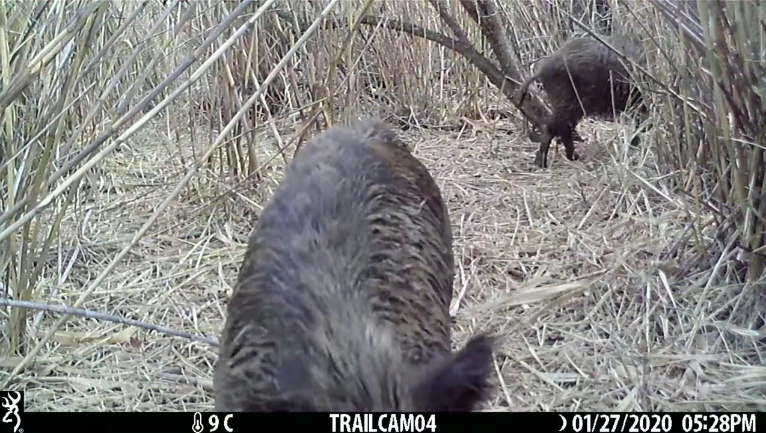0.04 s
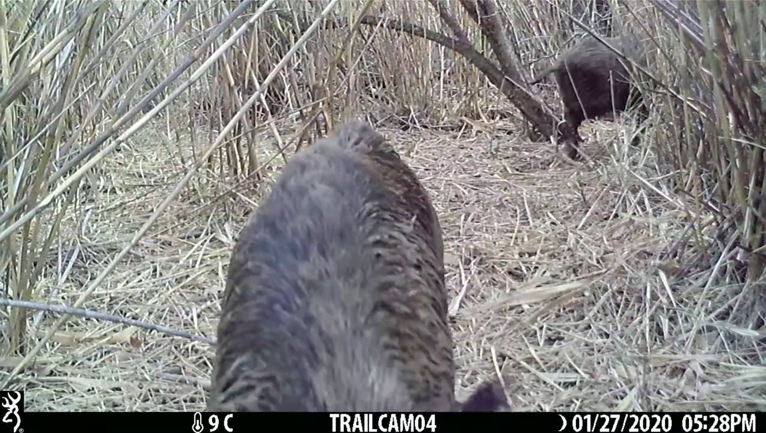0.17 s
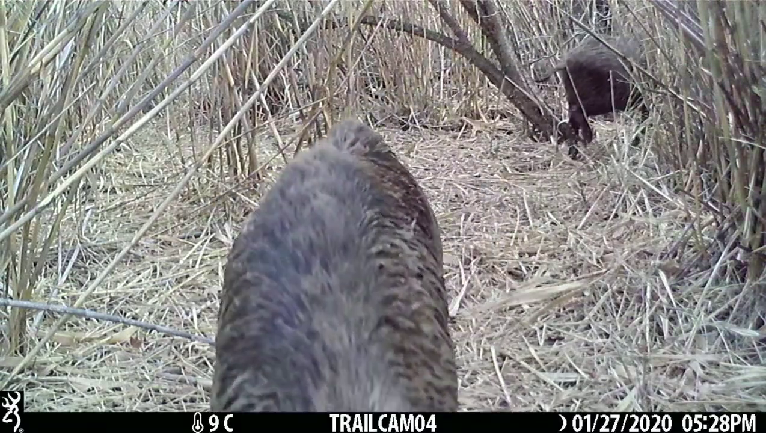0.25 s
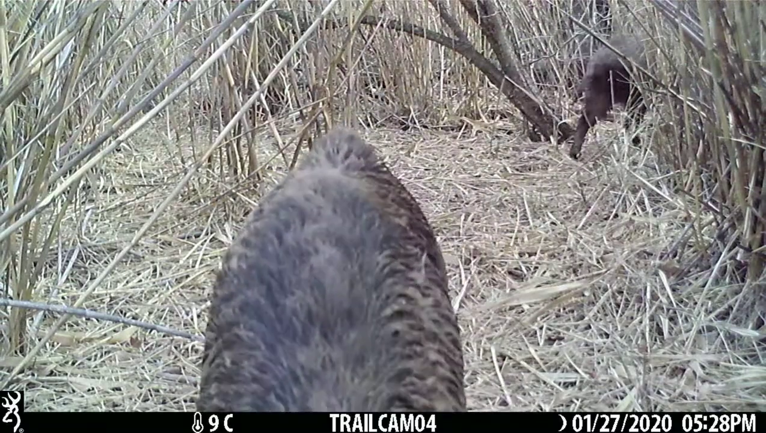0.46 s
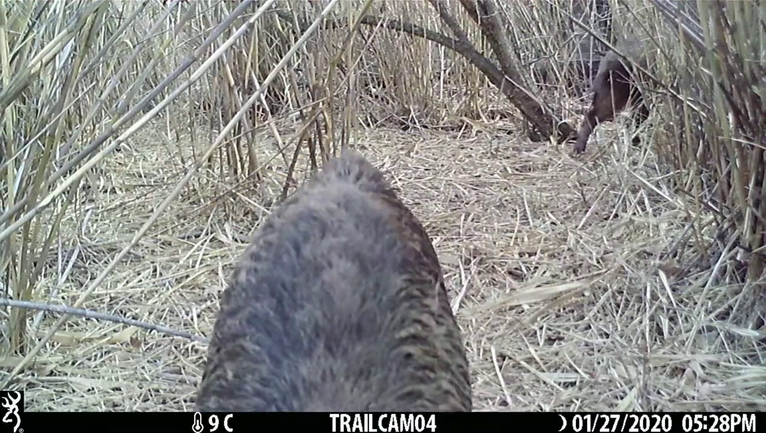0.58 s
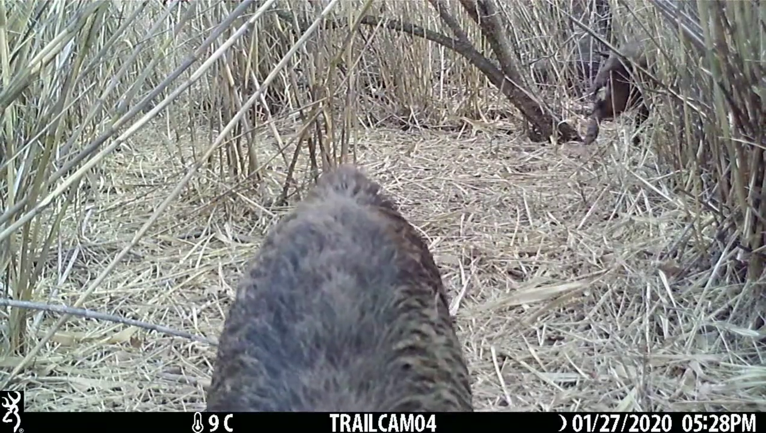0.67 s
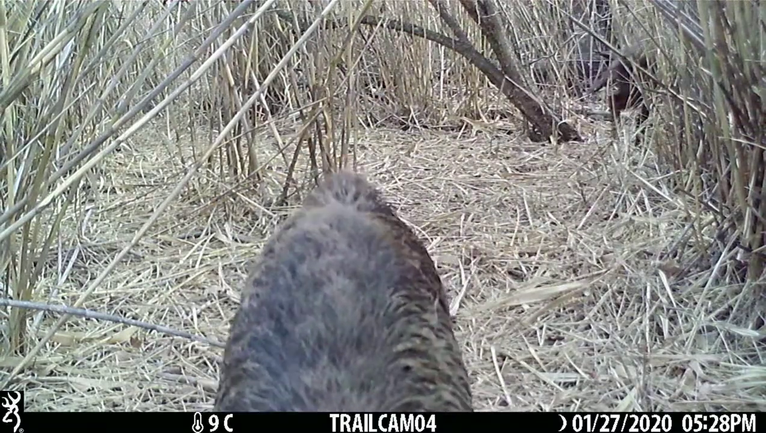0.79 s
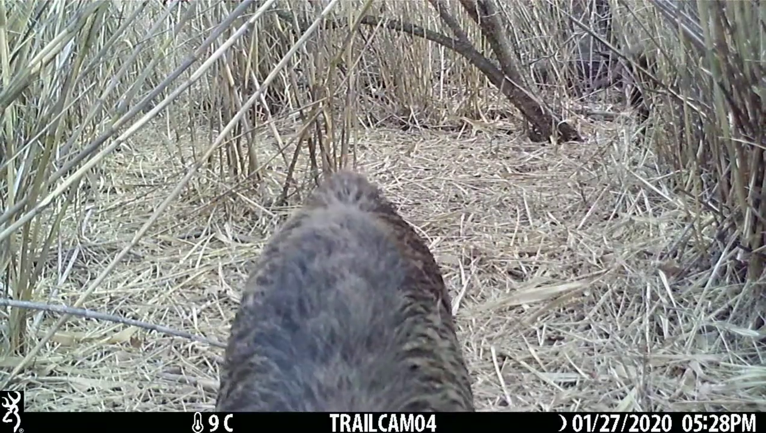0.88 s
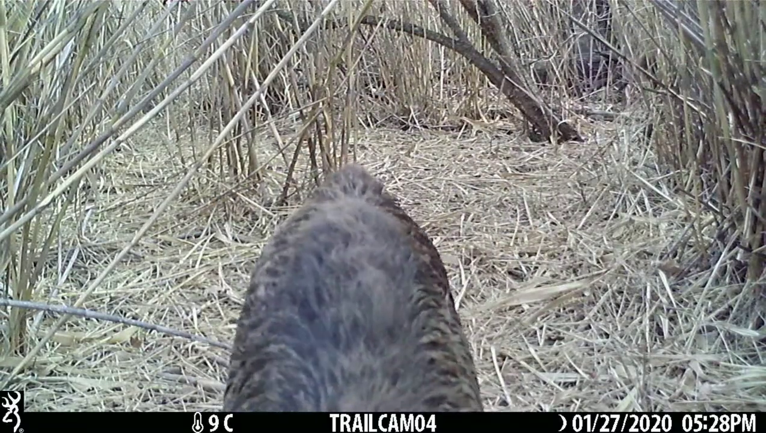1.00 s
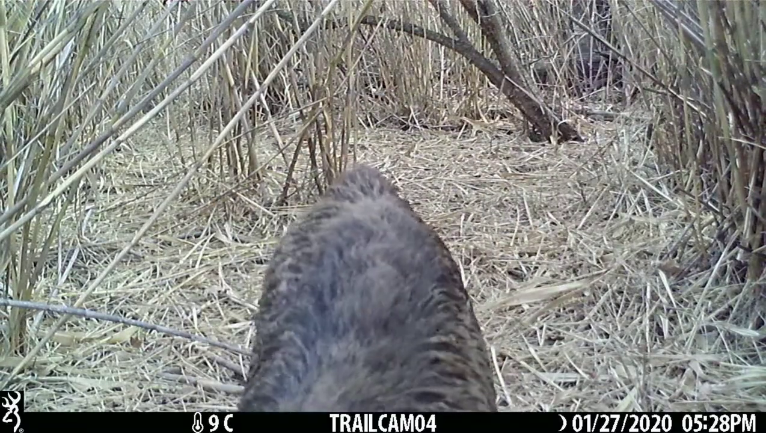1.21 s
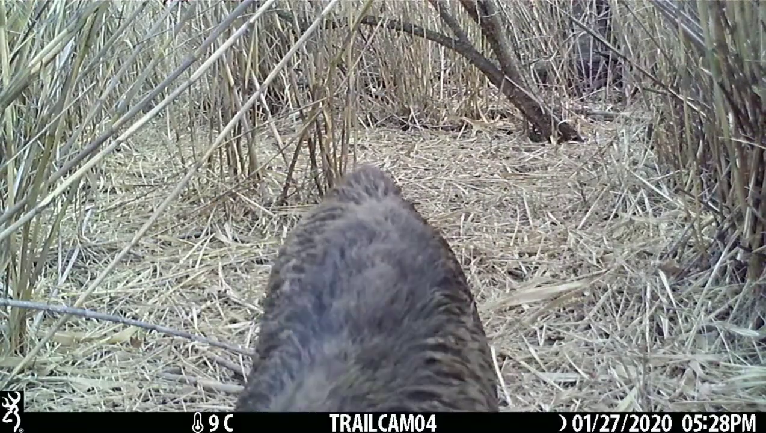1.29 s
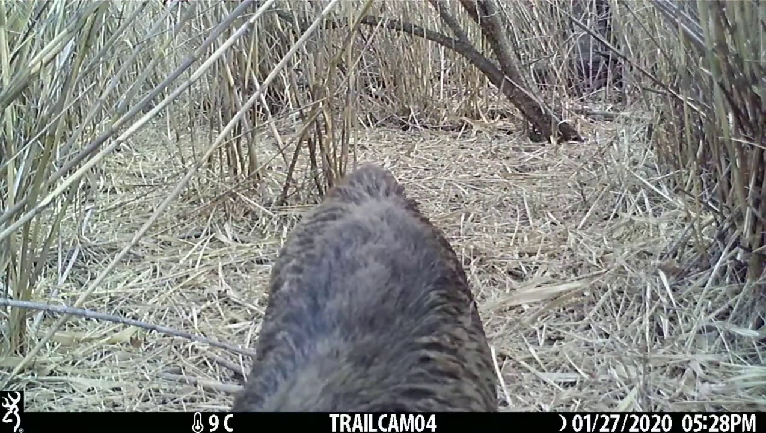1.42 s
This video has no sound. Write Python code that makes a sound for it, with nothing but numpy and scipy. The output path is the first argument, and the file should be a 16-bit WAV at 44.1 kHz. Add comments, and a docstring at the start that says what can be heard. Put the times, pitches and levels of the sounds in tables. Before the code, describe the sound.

Dry reeds rustle, crunch and snap under the feet of walking wild boar.

```python
"""Wild boar walk through dry reed litter. Each step crushes it into a swell of tiny brittle fractures;
single stalks snap and ring as damped resonators, and stirred leaves keep crackling in between.
The reed bed scatters the sound briefly. A faint steady hiss lies beneath, and the small microphone
port of a nearby trail camera resonates near 4.7 kHz."""
import sys
import numpy as np
from scipy import signal
from scipy.fft import rfft, irfft
from scipy.io import wavfile
from scipy.ndimage import uniform_filter1d

SR = 44100
rng = np.random.default_rng(int(sys.argv[2]) if len(sys.argv) > 2 else 0)


def unload_wav(signal):
    """Save mono or channel-first audio to the path in sys.argv[1] as 16-bit WAV at rate SR, clipped to [-1, 1]."""
    wavfile.write(
        sys.argv[1],
        SR,
        np.round(np.clip(np.atleast_2d(signal).T, -1, 1) * 32767).astype(np.int16),
    )


N = 63945

# Steps and shoves: peak t/s, level/dB, rise/s, fall/s, crunch/dB, treble/dB (last two re the step)
FOOTFALLS = [(.055, -60, 0.0856, 0.027, -17.5, 0.5), (.16, -63, 0.041, 0.0188, -14, 6.5),
             (.2, -51.5, 0.007, 0.06, -6, -2.5), (0.237, -41, 0.00458, 0.0096, -6, 2.5),
             (0.251, -37, 0.01007, 0.0139, -1.5, 3), (0.277, -41, 0.0096, 0.037, -7.5, -0.5),
             (.32, -53, .01, 0.081, 1.5, 3), (0.419, -53, 0.13, 0.105, -1, 0.5),
             (0.514, -44, 0.0258, 0.0234, -2, 0.5), (.565, -55, 0.0212, 0.064, -1, -0.5),
             (.735, -60.5, 0.014, 0.0304, 1, -5.5), (.803, -55.5, 0.0281, 0.0186, 2, -8),
             (0.876, -60.5, 0.012, 0.014, 1, -10), (.95, -55.5, 0.0073, 0.011, 0, -5.5),
             (1.0, -62, 0.0182, 0.0308, 5, -9), (1.075, -61, 0.022, 0.0297, 3, -2),
             (1.161, -52.5, 0.057, 0.0284, -7, 0.5), (1.192, -45.5, 0.0144, 0.0123, -3.5, 4.5),
             (1.274, -55, 0.031, 0.0402, -11, 0), (1.348, -56.5, 0.0079, 0.0248, -7.5, 5),
             (1.438, -57, 0.0052, 0.011, -14.5, -0.5)]
# Spectrum of crushed leaves: f/Hz, level/dB
LEAF_SPECTRUM = [(300, -27), (700, -19.5), (1400, -11.5), (2400, -2.5), (4500, 4.5), (7000, -0.5),
                 (9000, -3.5)]
# Spectrum of the packed layer below: f/Hz, level/dB
CRUNCH_SPECTRUM = [(40, -40), (150, -26.5), (350, -16.5), (600, -2), (1200, 3.5), (2200, 4.5), (3500, -16),
                   (8000, -24.5)]

def steps(t, fractures_per_s=4500, splinter_hz=5720):
    """Incoherent addition: leaves fracture and rub, packed litter crunches, and steps sum in power."""
    leaf_power, crunch_power, treble_power = np.zeros((3, N))
    for at, db, rise, fall, crunch_db, treble_db in FOOTFALLS:
        press = undb(db) * np.exp(-np.maximum((at - t) / rise, (t - at) / fall))
        leaf_power += press ** 2
        crunch_power += (press * undb(crunch_db)) ** 2
        treble_power += (press * undb(treble_db)) ** 2
    fractures = crackle(fractures_per_s, spread_db=13)
    rubbing = undb(-.5) * rng.standard_normal(N)
    leaves = unit(colour(fractures + rubbing, LEAF_SPECTRUM))
    highpass = signal.butter(4, splinter_hz, "high", fs=SR, output="sos")
    treble = signal.sosfiltfilt(highpass, leaves)  # the finest splinters
    impulses = rng.standard_normal(N) * (rng.random(N) < fractures_per_s / SR)
    crunch = undb(-14.5) * np.sqrt(crunch_power) * unit(colour(impulses, CRUNCH_SPECTRUM))
    return undb(6) * (np.sqrt(leaf_power) * (leaves - treble) + np.sqrt(treble_power) * treble + crunch)


# Breaking stalks: t/s, relative level/dB, resonance f/Hz, bandwidth as a fraction of f
STALK_BREAKS = [(0.0894, -36, 4080, 0.35), (0.192, -40, 4700, .3), (0.1997, -47.5, 4400, 0.18),
                (0.248, -22, 4960, 0.122), (.2505, -32.5, 5600, 0.397), (0.274, -34, 4500, 0.3),
                (0.2776, -29.5, 4000, 0.303), (.28, -30, 4600, .3), (0.3129, -25.5, 2845, 0.47),
                (.3218, -24, 4410, 0.84), (.3466, -36.5, 3740, 0.33), (0.41, -43, 3400, 0.34),
                (.5508, -31, 4495, 0.238), (.867, -43, 2470, 0.33), (0.9409, -36.5, 3647, .07),
                (.9422, -42.5, 5440, .3), (1.1597, -37.5, 5600, 0.334), (1.1917, -39.5, 4830, 0.41),
                (1.1951, -31.5, 3225, 0.304), (1.24, -36, 1960, 0.69), (1.2461, -35.5, 5200, 0.29),
                (1.2839, -31.5, 6730, 0.42), (1.3452, -37, 4540, 0.2), (1.3575, -43.5, 4300, 0.5),
                (1.4031, -47, 4550, .15)]
# Spectrum shared by all stalks: f/Hz, level/dB
STALK_SPECTRUM = [(60, -30.5), (400, -18), (1200, -3.5), (2500, 0.5), (9000, 1)]

def snaps(t, splinter_s=.00081):
    """Impulse excitation: a sharp break and milliseconds of splintering ring each stalk at its pitch."""
    out, age = np.zeros(N), t[:SR // 20]
    for at, db, hz, width in STALK_BREAKS:
        splinters = rng.standard_normal(len(age)) * age * np.exp(-age / splinter_s)
        force = undb(-7.5) * splinters / np.linalg.norm(splinters)
        force[0] += 1  # the break itself
        click = undb(-23) * force
        crack = ring(force, hz, width) + click
        crack *= undb(db + 12.5) / np.linalg.norm(crack)
        start = int(at * SR)
        out[start:start + len(age)] += crack[:N - start]
    return colour(out, STALK_SPECTRUM)


# Envelope of the stirred leaves, with one brief lull: t/s, relative level/dB
STIR_ENVELOPE = [(0, 1), (.65, 0), (.85, -1.5), (.92, -12.5), (.96, -1.5), (1.2, -1), (1.45, -0.5)]
# Spectrum of the stirred leaves: f/Hz, level/dB
STIR_SPECTRUM = [(300, -26), (700, -17), (1400, -9), (2400, -4), (4400, 2), (6000, 0.5), (9000, -5.5)]

def stirred_leaves(t):
    """Shot noise: disturbed leaves tick faintly at independent, random instants."""
    db = -60.5 + np.interp(t, *np.array(STIR_ENVELOPE).T)
    ticks = crackle(per_s=2500, spread_db=19.5)
    return undb(db) * unit(colour(ticks, STIR_SPECTRUM))


def crackle(per_s, spread_db, pieces=12):
    """Poisson process: fractures of very unequal size excite the resonances of leaf pieces."""
    out = np.zeros(N)
    for hz in np.linspace(900, 8500, pieces):
        chance, size = rng.random((2, N))
        clicks = (chance < per_s / pieces / SR) * undb(-spread_db * np.sqrt(size))
        out += unit(ring(clicks, hz, width=.39 * np.sqrt(4500 / hz)))
    local_power = uniform_filter1d(out ** 2, size=1300)
    return out / np.sqrt(local_power + np.mean(out ** 2) / 20)  # evens out the level


def reed_bed(x, t, t60_s=.2, build_s=.0043):
    """Multiple scattering: many thin stems return a short, dense tail."""
    tail = rng.standard_normal(N) * undb(-60 * t / t60_s) * (1 - np.exp(-t / build_s))
    return x + undb(-14) * signal.fftconvolve(x, tail / np.linalg.norm(tail))[:N]


# Spectrum of the hiss: f/Hz, level/dB
NOISE_SPECTRUM = [(25, -3.5), (60, -4), (130, -5), (180, -3), (230, 1), (320, 1), (420, -2.5), (1200, -1),
                  (2200, -4), (4500, 2.5), (8000, -5.5), (12000, -10.5)]

def hiss():
    """Stationary Gaussian noise: a faint, broadband floor."""
    return undb(-60.5) * unit(colour(rng.standard_normal(N), NOISE_SPECTRUM))


def ring(x, hz, width):
    """Damped resonance with quality factor 1 / width."""
    return signal.lfilter(*signal.iirpeak(hz, 1 / width, fs=SR), x)


def colour(x, points, size=2048):
    """Minimum-phase filtering through points of f/Hz, level/dB."""
    hz, db = np.array(points, float).T
    f = np.maximum(np.fft.rfftfreq(size, 1 / SR), 1)
    gain = undb(np.interp(np.log(f), np.log(hz), db))
    cepstrum = irfft(np.log(gain))
    cepstrum[1:size // 2] *= 2  # folding makes the response causal
    cepstrum[size // 2 + 1:] = 0
    return signal.fftconvolve(x, irfft(np.exp(rfft(cepstrum))))[:len(x)]


def undb(db):
    """Amplitude ratio of a level in decibels."""
    return 10 ** (np.asarray(db) / 20)


def unit(x):
    """Normalisation to unit rms."""
    return x / np.sqrt(np.mean(x ** 2) + 1e-18)


def scene():
    """Superposition: steps, snaps and leaves, scattered by the reeds, add to the hiss."""
    t = np.arange(N) / SR
    noise_floor = hiss()
    litter = steps(t) + snaps(t) + stirred_leaves(t)
    return (reed_bed(litter, t) + noise_floor)[None]


# Frequency response of the microphone and its port: f/Hz, level/dB
PORT_RESPONSE = [(100, -13), (1000, -14), (2000, -10), (3000, -10), (3700, -5.5), (4250, -2.02),
                 (4650, 1.67), (5300, -3.5), (5800, -6.5), (6500, -6.5), (7400, -10.5), (8100, -17.5),
                 (8700, -28.5), (9200, -48)]

def record(dry, cutoff_hz=9000):
    """Resonance and band limiting: the microphone port rings in the treble; the camera cuts the top."""
    heard = colour(dry[0], PORT_RESPONSE)
    lowpass = signal.ellip(10, .2, 80, cutoff_hz, fs=SR, output="sos")
    return signal.sosfilt(lowpass, heard)[None]


dry = scene()
out = record(dry)
unload_wav(out)
```